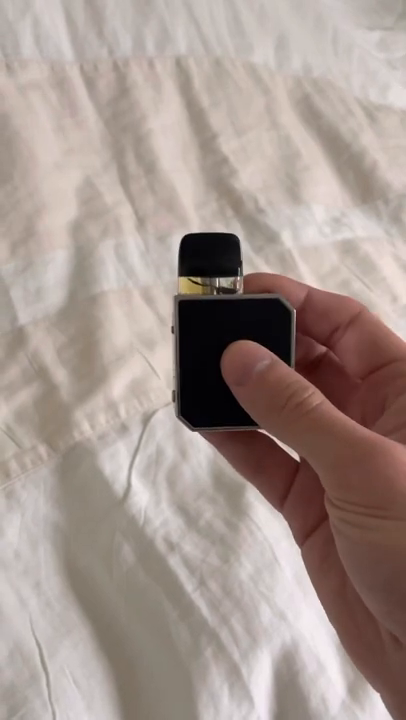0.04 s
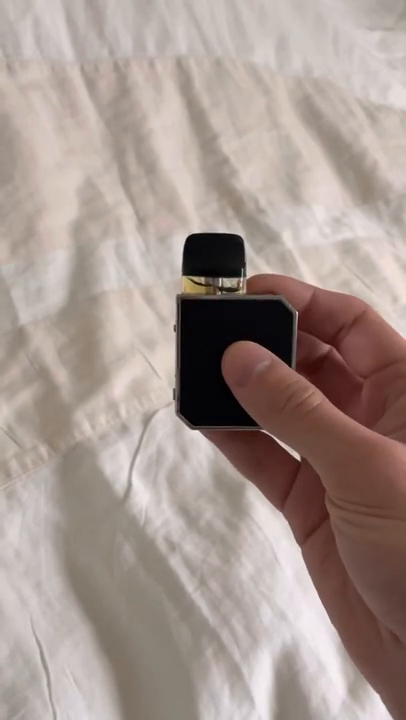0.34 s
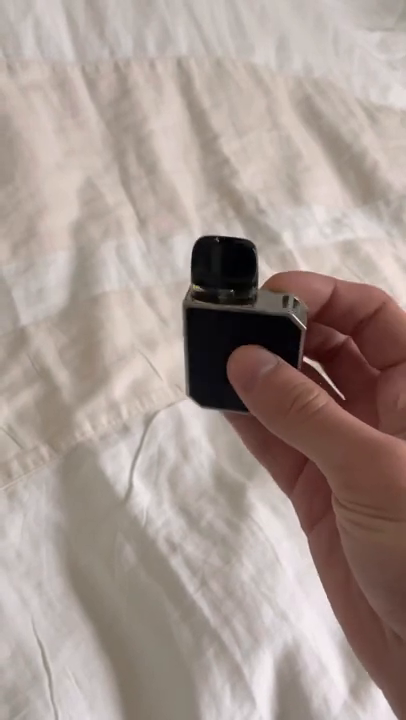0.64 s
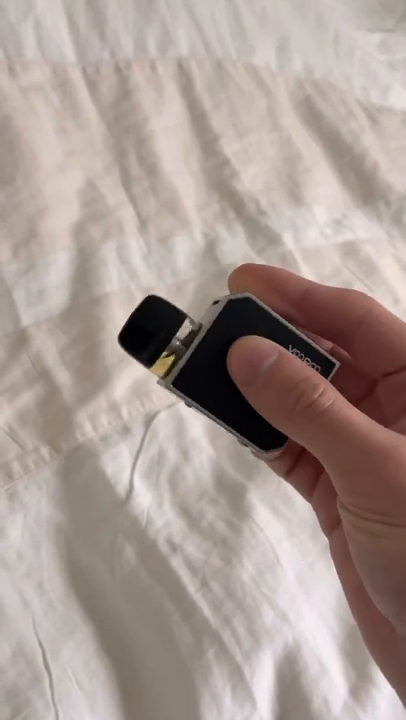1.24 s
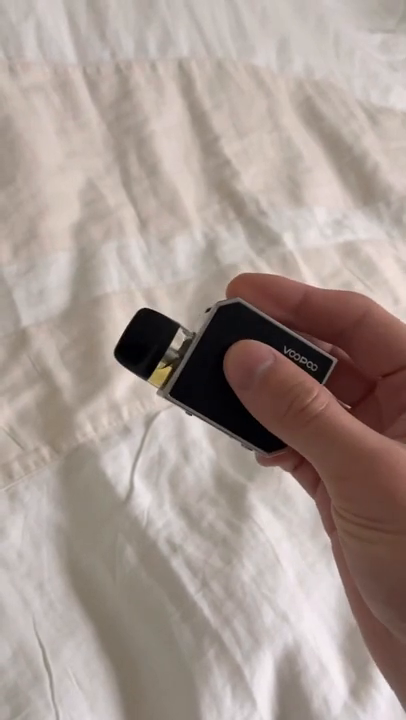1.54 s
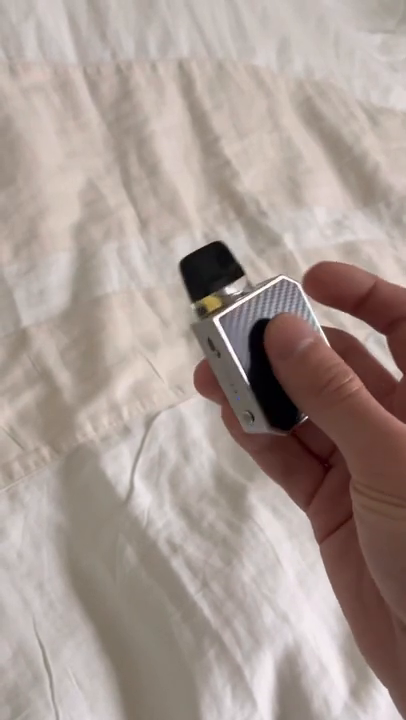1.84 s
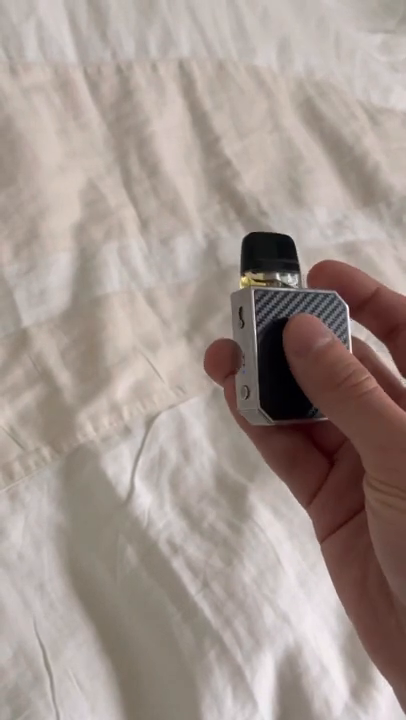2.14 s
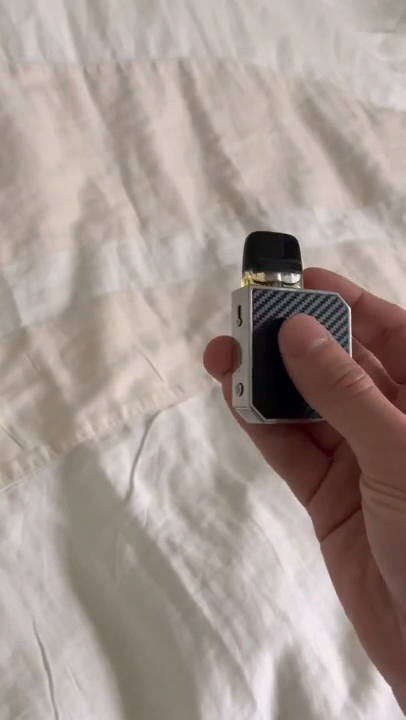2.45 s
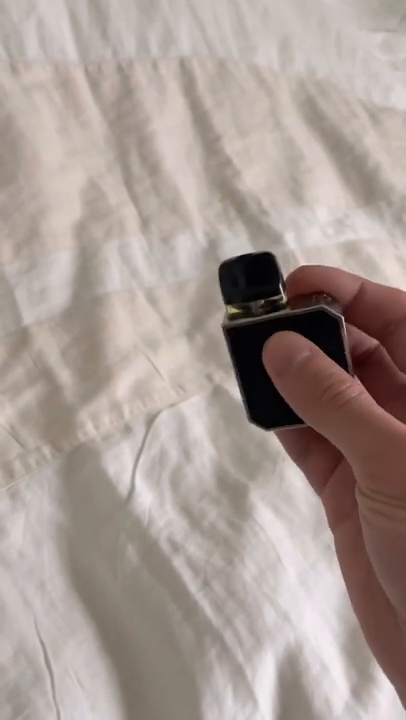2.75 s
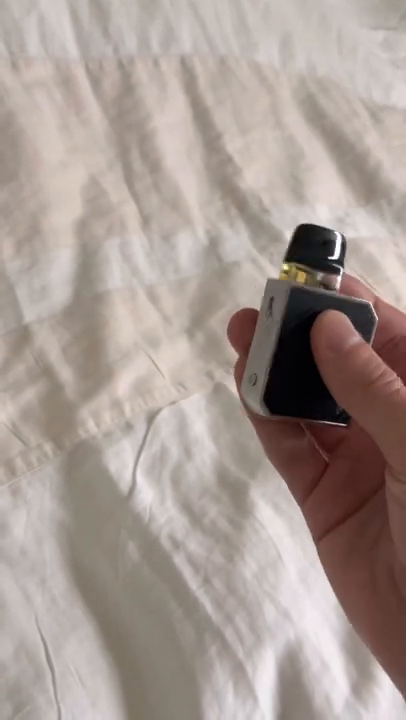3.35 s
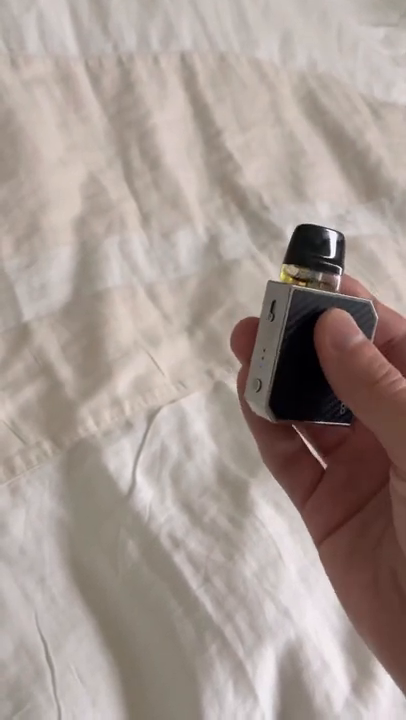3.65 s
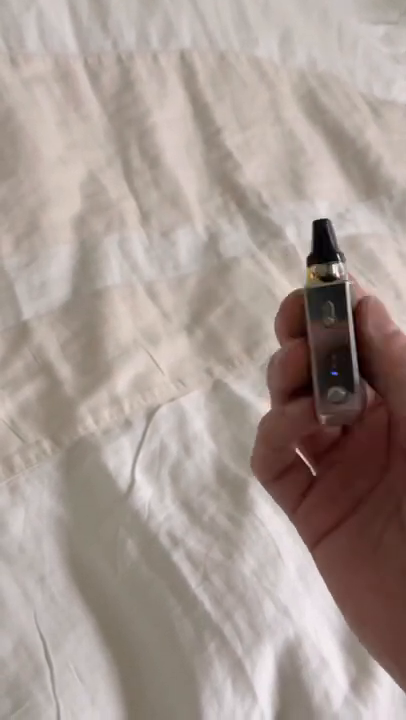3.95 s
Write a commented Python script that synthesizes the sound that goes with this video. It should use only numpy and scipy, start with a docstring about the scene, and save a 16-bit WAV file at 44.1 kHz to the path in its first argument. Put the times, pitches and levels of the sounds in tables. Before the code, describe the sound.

Close up in a quiet room, a small vaporizer sizzles: a thin fizz first, then a stuttering run of bright bubbling bursts and little pops as liquid boils, with faint finger taps and rubbing underneath.

```python
"""A small hand-held vaporizer fires in stuttering bursts.
Liquid boils on the coil: a dense crackle of bubbles over steam that rings the mouthpiece.
At first the coil only fizzes thinly; larger droplets pop.
Fingers tap and rub the case. A quiet bedroom adds a short tail, low rumble and faint air."""
import sys
import numpy as np
from scipy import signal
from scipy.fft import rfft, irfft, next_fast_len
from scipy.io import wavfile
from scipy.ndimage import map_coordinates

SR = 44100
rng = np.random.default_rng(int(sys.argv[2]) if len(sys.argv) > 2 else 0)


def generate_wav(signal):
    """Clip the signal to [-1, 1] and save it as 16-bit WAV at the path in sys.argv[1]."""
    frames = np.transpose(np.atleast_2d(signal))
    scaled = np.clip(frames, -1, 1) * 32767
    pcm = np.round(scaled).astype(np.int16)
    wavfile.write(sys.argv[1], SR, pcm)


N = 176400

ATTACK_S, RELEASE_S, SIMMER_S, SIMMER_DB = 0.015, 0.01, 0.066, -13.5
RING_HZ, RING_RISE_HZ_PER_S, RING_WIDTH_HZ = 4390, 60, 420


def boiling():
    """Liquid boils on the coil in bursts that ring the mouthpiece."""
    # start_s, end_s, level_db, ring_db
    bursts = [(.359, 0.547, -44, 16.5), (0.588, 0.633, -42, 14.5), (0.711, 0.751, -39, 14),
              (0.8, 0.965, -39.5, 16), (1.04, 1.139, -40.5, 15.5), (1.224, 1.357, -41, 10),
              (1.435, 1.457, -43, 11.5), (1.497, 1.508, -39.5, 8.5), (1.556, 1.658, -41.5, 7),
              (1.739, 1.808, -41, 14), (1.891, 1.961, -42.5, 19), (2.013, 2.059, -43, 16),
              (2.1, 2.21, -43.5, 14.5), (2.25, 2.299, -42, 14.5), (2.341, 2.444, -42, 14.5),
              (2.526, 2.562, -40, 13.5), (2.616, 2.846, -41.5, 14), (2.919, 2.957, -37.5, 12),
              (3.008, 3.139, -40, 12), (3.188, 3.262, -40, 14), (3.343, 3.378, -40, 11),
              (3.432, 3.498, -40.5, 10.5), (3.591, 3.688, -42, 11.5), (3.734, 3.81, -40, 11),
              (3.852, 3.961, -40, 12.5)]
    out = np.zeros(N)
    for start_s, end_s, level_db, ring_db in bursts:
        burst = firing(end_s - start_s, lambda hz: boil_colour(hz, start_s, ring_db),
                       spread_db=2.5, spitting=True)
        add(out, start_s - ATTACK_S / 2, amp(level_db) * burst)
    return out


def firing(length_s, colour_db, spread_db, spitting, bubbles_per_s=3500, steam_db=-4.5):
    """Tiny bubbles burst over steam; the level swells, holds, drops and simmers out."""
    t = np.arange(int(length_s * SR) + SR // 5) / SR
    onsets = rng.random(len(t)) < bubbles_per_s / SR
    size_db = spread_db * np.minimum(rng.standard_normal(len(t)), 2.6)
    bubbles = onsets * amp(size_db) * rng.choice([-1, 1], len(t))
    boil = unit(unit(bubbles) + amp(steam_db) * rng.standard_normal(len(t)))
    off_s = np.maximum(t - length_s - ATTACK_S / 2, 0)
    heating = np.minimum(t / ATTACK_S, 1) ** 1.42
    cooling = np.maximum(np.exp(-off_s / RELEASE_S), amp(SIMMER_DB) * np.exp(-off_s / SIMMER_S))
    heat = heating * cooling
    if not spitting:
        return signal.fftconvolve(boil * heat, impulse(colour_db))
    heat *= amp(wobble(t, knots_per_s=170.7))  # quick, uneven clusters, about 1 dB
    return signal.fftconvolve(boil * heat, impulse(colour_db))[:len(t)] + heat * spits(t)


def boil_colour(hz, start_s, ring_db, tilt_db_per_oct_s=0.75, pivot_hz=4040, neutral_s=2.8):
    """Burst spectrum in dB: the boil, brighter with time, plus the mouthpiece resonance."""
    # boil spectrum: freq_hz, gain_db
    spectrum = [(150, -23.5), (550, -34.5), (1100, -13.5), (2000, -15), (2800, -2), (3400, -7), (4300, -2),
                (6200, -1), (8500, -1.5), (10700, 3), (13000, 1), (14500, -8), (15500, -6)]
    octaves = np.clip(np.log2((hz + 1) / pivot_hz), -0.5, 0.5)
    tilt_db = tilt_db_per_oct_s * (start_s - neutral_s) * octaves
    resonance_db = ring_db / (1 + ((hz - mouthpiece_hz(start_s)) / RING_WIDTH_HZ) ** 2)
    return along(spectrum, hz) + tilt_db + resonance_db


def mouthpiece_hz(time_s):
    """Slowly rising pitch of the mouthpiece."""
    return RING_HZ + RING_RISE_HZ_PER_S * time_s


def spits(t, rate_per_s=110, centre_hz=7400, t60_s=0.0045):
    """Small droplets tick, each at its own pitch within an octave of the centre."""
    out, age_s = np.zeros(len(t)), t[:SR // 200]
    for when, size, pitch in rng.random((int(rate_per_s * t[-1]), 3)):
        level_db = 0.5 + 0.5 * min(-np.log(1 - size), 2)
        pitch_hz = centre_hz * 2 ** (2 * pitch - 1)
        tick = amp(level_db - 60 * age_s / t60_s) * np.sin(2 * np.pi * pitch_hz * age_s)
        add(out, when * t[-1], tick)
    return out


def fizzing():
    """The coil fizzes thinly, without the ring, before the liquid boils."""
    # start_s, end_s, level_db
    fizzes = [(0.016, 0.359, -42)]
    # fizz spectrum: freq_hz, gain_db
    spectrum = [(200, -29.5), (550, -37.5), (1100, -18), (2000, -18.5), (3000, 0), (4200, -10), (5400, -16),
                (6500, -8), (10000, -20.5), (13500, -10), (15400, -1.5)]
    out = np.zeros(N)
    for start_s, end_s, level_db in fizzes:
        fizz = firing(end_s - start_s, lambda hz: along(spectrum, hz), spread_db=4, spitting=False)
        add(out, start_s - ATTACK_S / 2, amp(level_db) * fizz)
    return out


def pops(rise_s=0.000095, crack_t60_s=0.0074, ring_t60_s=0.0083):
    """Droplets burst: a bright crack, slightly different in each ear, and a brief mouthpiece ring."""
    # start_s, crack_rel_db, ring_rel_db
    droplets = [(.023, -31, -46), (.7236, -28, -26), (.8659, -35, -28), (.9049, -35, -31),
                (1.0502, -33, -27), (1.0595, -28, -26), (1.0657, -32, -34), (1.0685, -20, -26),
                (1.2553, -26, -28), (1.446, -24.5, -28), (1.5695, -35, -31), (1.5852, -29, -35),
                (1.7478, -25, -31), (1.7795, -30, -27), (1.896, -32, -38), (1.9573, -34, -34),
                (2.1425, -31, -38), (2.2867, -31, -26), (2.5437, -35, -29), (2.6262, -33, -43),
                (2.934, -29, -26), (3.0272, -33, -35), (3.086, -32, -41), (3.3485, -26, -39),
                (3.3508, -24, -41), (3.4415, -26, -29), (3.4499, -31, -26), (3.8613, -31, -32)]
    # crack spectrum: freq_hz, gain_db
    spectrum = [(200, -24), (600, -24), (2000, -14), (3000, -7), (6200, 1), (8500, -1), (11000, 1),
                (16000, -3)]
    crack_db, ring_db, per_ear_db = 13.5, 3.5, -8
    out, t = np.zeros((2, N)), np.arange(SR // 30) / SR
    colour = impulse(lambda hz: along(spectrum, hz))
    rise = 1 - np.exp(-t / rise_s)
    for start_s, crack_rel_db, ring_rel_db in droplets:
        snaps = rng.standard_normal((3, len(t))) * rise * amp(-60 * t / crack_t60_s)
        cracks = signal.fftconvolve(snaps, colour[None], axes=1)
        common, *per_ear = cracks / np.linalg.norm(cracks, axis=1, keepdims=True)
        pitch_hz = mouthpiece_hz(start_s) * (1 + rng.normal(0, 0.019))
        envelope = rise * amp(ring_db + ring_rel_db - 60 * t / ring_t60_s)
        ring = envelope * np.sin(2 * np.pi * pitch_hz * t)
        for channel, own in zip(out, per_ear):
            add(channel, start_s, amp(crack_db + crack_rel_db) * (common + amp(per_ear_db) * own))
            add(channel, start_s, ring)
    return out


def finger_taps():
    """Damped taps and a short scuff on the case: decaying band-passed noise."""
    # start_s, level_db, pitch_hz, t60_s
    taps = [(1.061, -63, 181, 0.026), (1.712, -45, 2480, 0.0028), (2.934, -50, 900, 0.0094),
            (2.936, -55.5, 173, 0.051), (3.555, -40, 5700, 0.22)]
    out, t = np.zeros(N), np.arange(SR // 10) / SR
    for start_s, level_db, pitch_hz, t60_s in taps:
        body = impulse(lambda hz: -10 * np.log10(1 + (2 * np.log2((hz + 1) / pitch_hz)) ** 4))
        contact = rng.standard_normal(len(t)) * amp(-60 * t / t60_s)
        add(out, start_s, amp(level_db) * signal.fftconvolve(contact, body))
    return out


def finger_rub():
    """Fingers rumble on the case as the grip shifts."""
    # rub spectrum: freq_hz, gain_db
    spectrum = [(40, -15), (70, 19.5), (130, -12), (320, -2.5), (500, -88), (1500, -33)]
    # rub envelope: time_s, level_db
    grip = [(0, -78), (.9, -94), (1.2, -81), (1.95, -71.5), (2.15, -62.5), (2.35, -70.5), (3.1, -85),
            (4, -101)]
    level_db = np.interp(np.arange(N) / SR, *np.transpose(grip))
    return amp(level_db) * (noise(spectrum, channels=1) + 0.38 * noise(spectrum, channels=2))


def room_tail(x, t60_s=0.25, cutoff_hz=6500):
    """Short stereo reverberation; the bedding soaks up its treble."""
    t = np.arange(SR // 2) / SR
    tail = rng.standard_normal((2, len(t))) * amp(-60 * t / t60_s)
    wet = signal.fftconvolve(x, tail / np.linalg.norm(tail[0]), axes=1)[:, :N]
    return filtered(wet, lambda hz: 1 / np.sqrt(1 + (hz / cutoff_hz) ** 8))


def room_tone(rumble_db=-70.5, air_db=-69):
    """Low room rumble and faint air."""
    # rumble spectrum: freq_hz, gain_db
    rumble = [(20, -22), (33, 1.5), (48, 13), (70, 6), (100, 3.5), (170, -21.5), (400, -76.5)]
    # air spectrum: freq_hz, gain_db
    air = [(50, -2), (150, 6), (300, 1), (600, -7.5), (2000, -6), (6000, 3.5), (15000, -68)]
    return amp(rumble_db) * noise(rumble, channels=1) + amp(air_db) * noise(air, channels=2)


def stereo_widening(hz):
    """Frequency-dependent phase and level differences between left and right widen the sound."""
    # freq_hz, left_lead_rad
    phase = [(2400, 0), (3200, -3.1), (4000, -6.3), (5300, -6.1), (7400, -4.7), (8400, -3.2),
             (11000, -3.05), (12000, -1.9), (13000, -1.4), (14400, 0)]
    # freq_hz, left_minus_right_db
    balance = [(600, 12), (1000, -6), (2150, 1), (2500, 10.5), (2850, -15.5), (3600, 10), (4300, 3.5),
               (4800, -13), (5400, -0.5), (8000, -0.5)]
    sides = np.array([[1], [-1]])
    gain = amp(sides * along(balance, hz) / 2)
    gain /= np.sqrt(np.mean(gain ** 2, axis=0))
    return gain * np.exp(0.5j * sides * along(phase, hz))


def amp(db):
    """Decibels to gain."""
    return 10 ** (np.asarray(db) / 20)


def unit(x):
    """Scale to rms 1."""
    return x / np.sqrt(np.mean(x ** 2) + 1e-20)


def along(points, hz):
    """Interpolate (freq_hz, value) points on a log axis."""
    freq_hz, values = np.transpose(points)
    return np.interp(np.log(hz + 1), np.log(freq_hz + 1), values)


def filtered(x, response):
    """Apply a frequency response."""
    size = next_fast_len(N + SR // 4)
    return irfft(rfft(x, size) * response(np.fft.rfftfreq(size, 1 / SR)), size)[..., :N]


def impulse(colour_db, size=1024):
    """Minimum-phase impulse response of energy 1."""
    cepstrum = irfft(np.log(amp(colour_db(np.fft.rfftfreq(size, 1 / SR)))))
    cepstrum[1:size // 2] *= 2
    cepstrum[size // 2 + 1:] = 0
    response = irfft(np.exp(rfft(cepstrum)))
    return response / np.linalg.norm(response)


def add(track, start_s, sound):
    """Mix a sound into the track."""
    i = max(round(start_s * SR), 0)
    part = track[i:i + len(sound)]
    part += sound[:len(part)]


def noise(spectrum, channels):
    """Coloured noise of rms 1."""
    return unit(filtered(rng.standard_normal((channels, N)), lambda hz: amp(along(spectrum, hz))))


def wobble(t, knots_per_s):
    """Smooth random curve."""
    return map_coordinates(rng.standard_normal(int(t[-1] * knots_per_s) + 4), [t * knots_per_s])


def scene(tail_db=-14):
    """The vaporizer, close and widened, in a quiet bedroom."""
    device = boiling() + fizzing() + pops() + finger_taps()
    wide = filtered(device, stereo_widening)
    return wide + amp(tail_db) * room_tail(device) + finger_rub() + room_tone()


def record(dry):
    """Brick-wall low-pass."""
    return filtered(dry, lambda hz: hz < 15900)


dry = scene()
out = record(dry)
generate_wav(out)
```